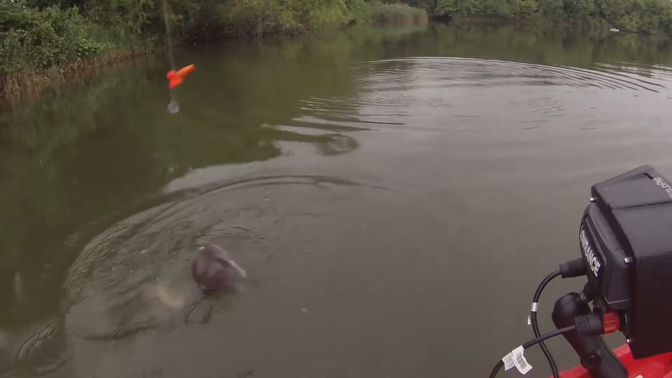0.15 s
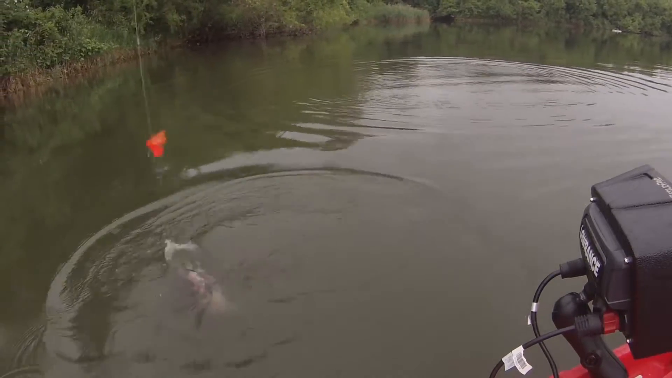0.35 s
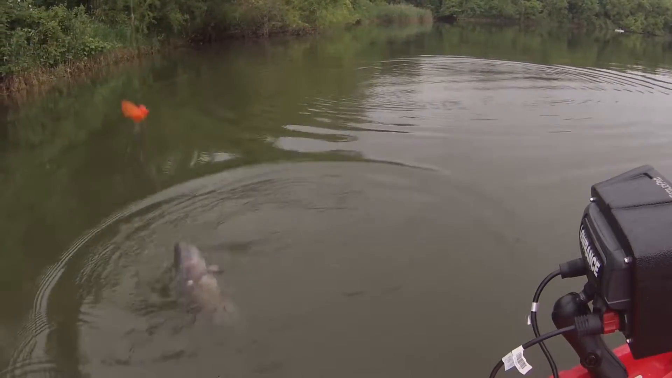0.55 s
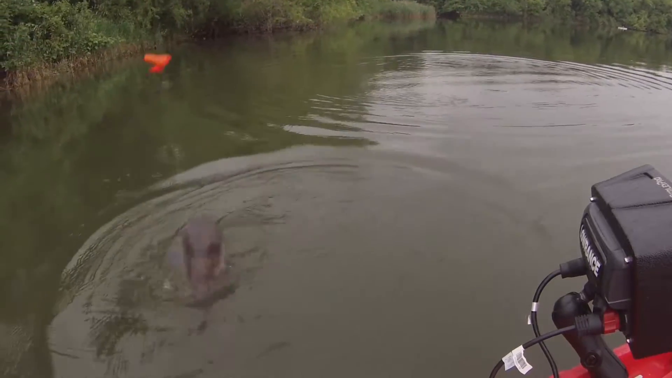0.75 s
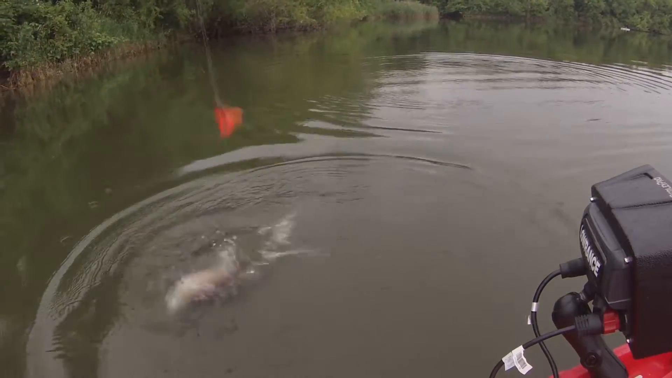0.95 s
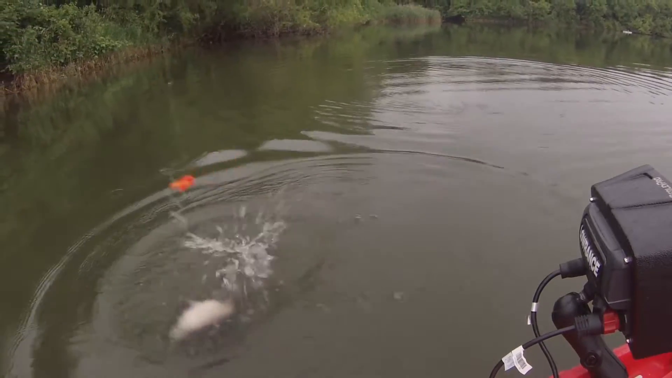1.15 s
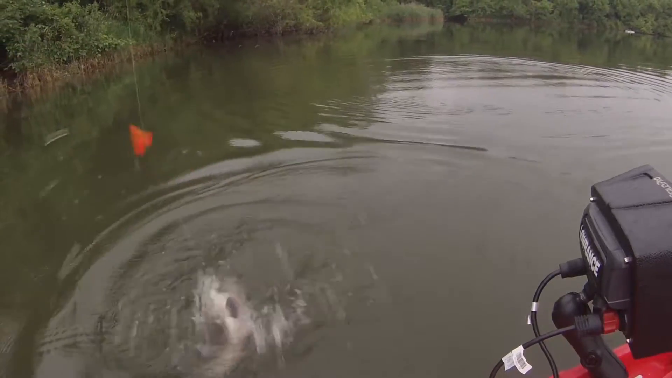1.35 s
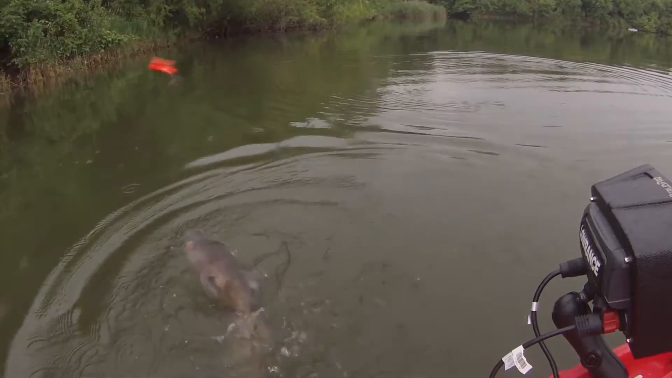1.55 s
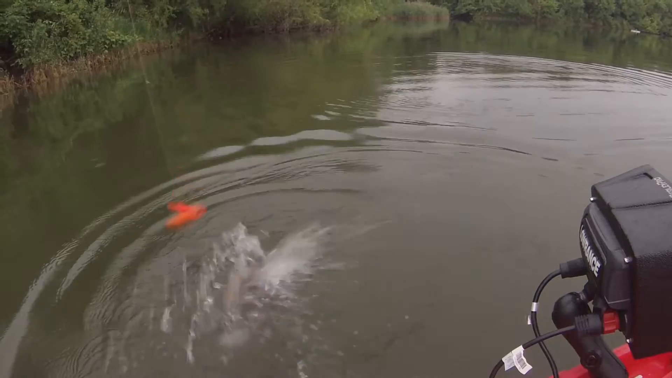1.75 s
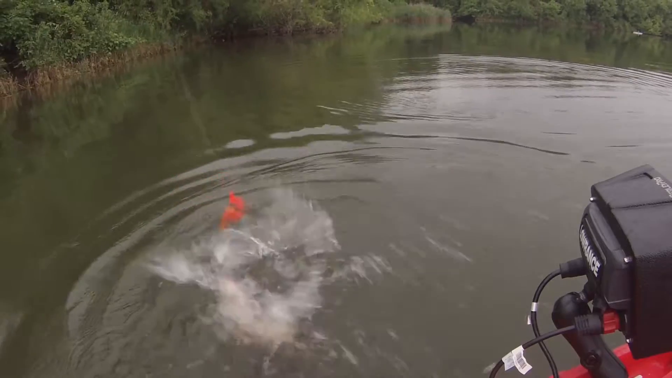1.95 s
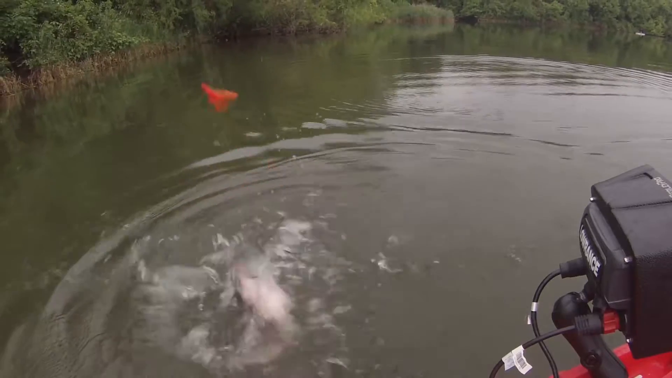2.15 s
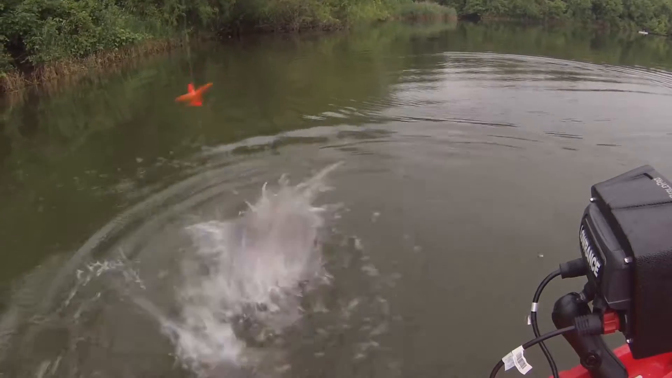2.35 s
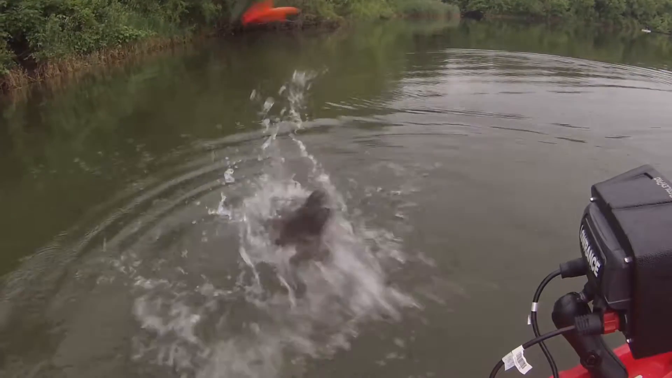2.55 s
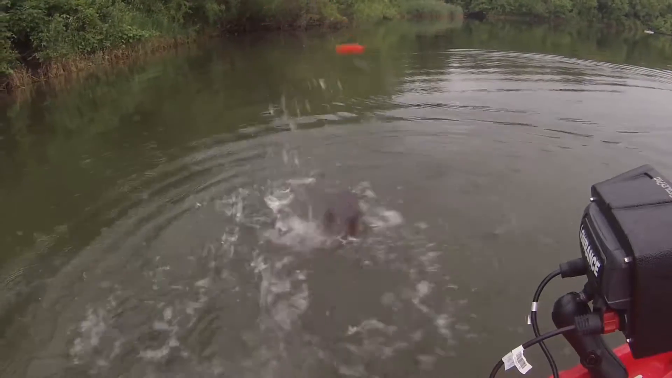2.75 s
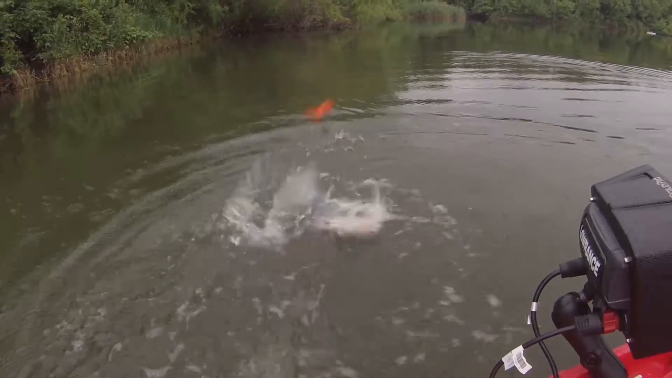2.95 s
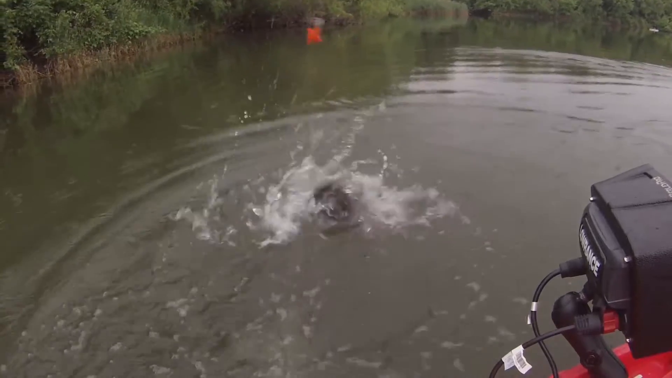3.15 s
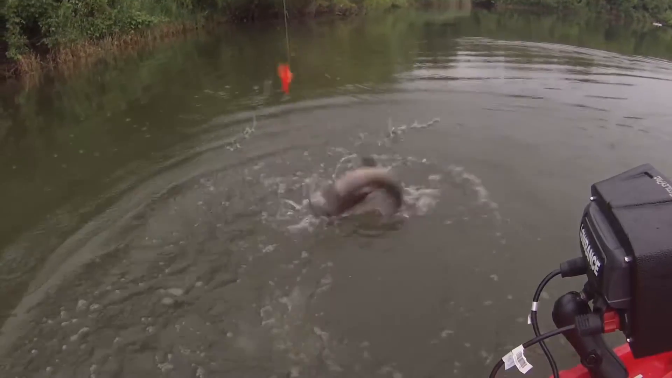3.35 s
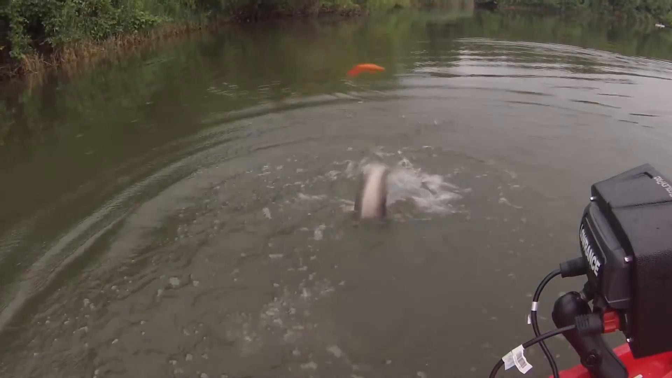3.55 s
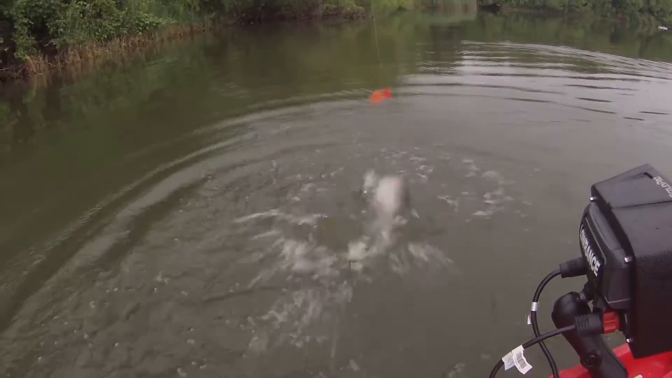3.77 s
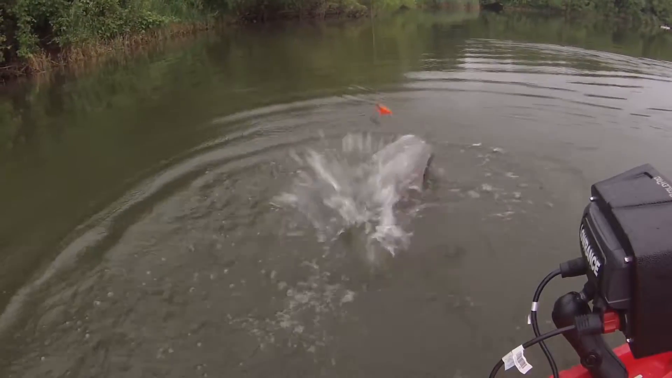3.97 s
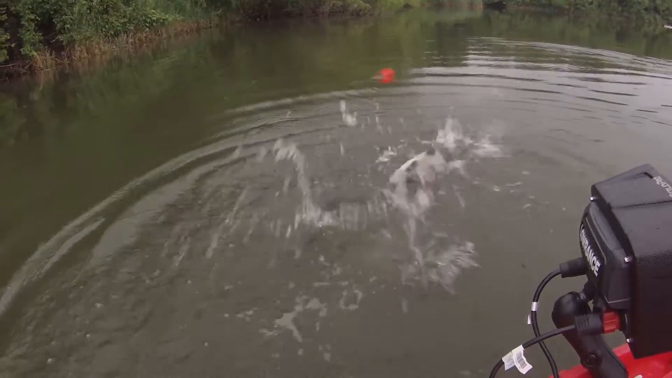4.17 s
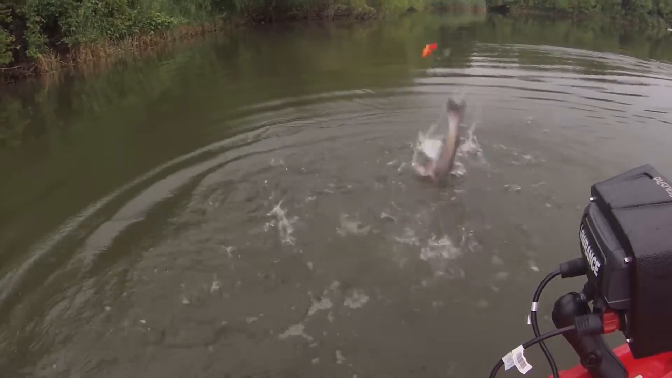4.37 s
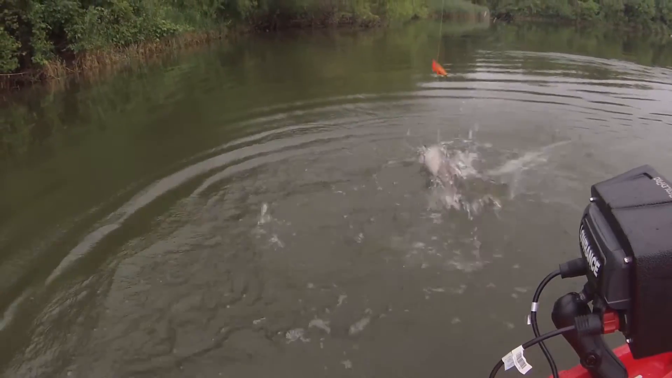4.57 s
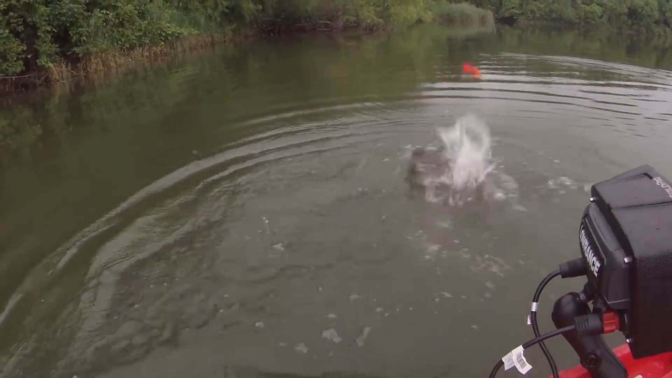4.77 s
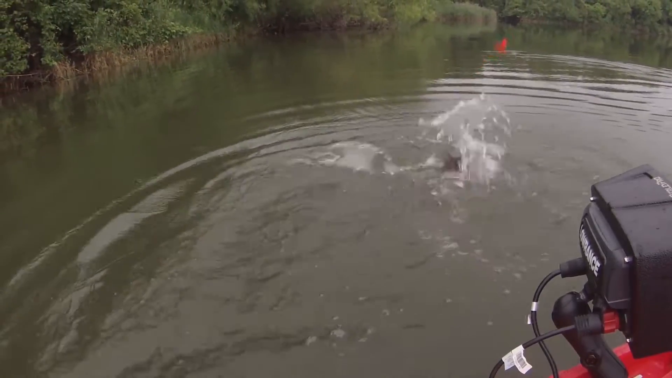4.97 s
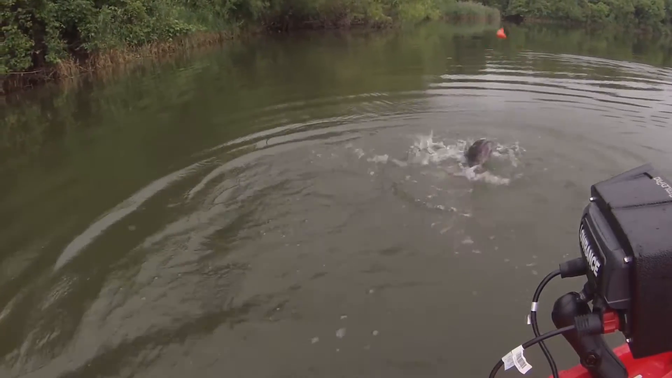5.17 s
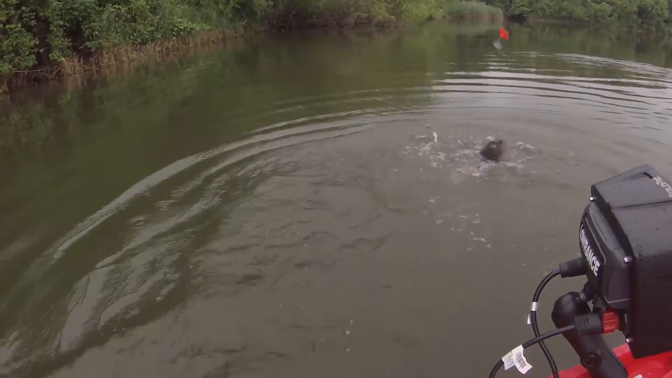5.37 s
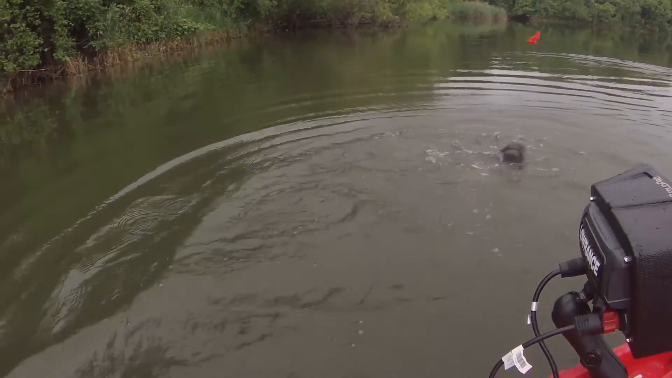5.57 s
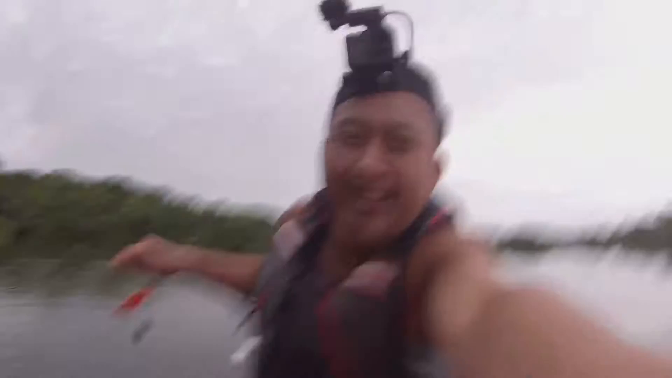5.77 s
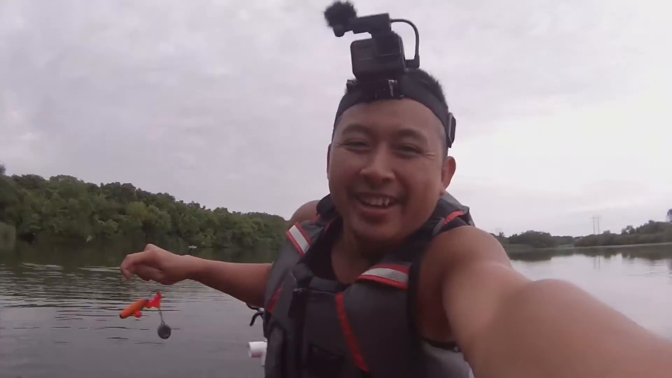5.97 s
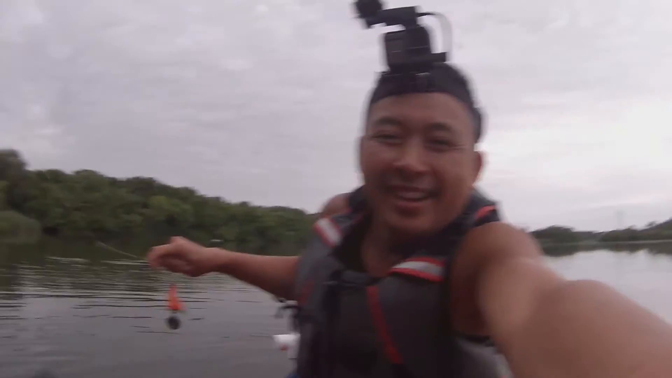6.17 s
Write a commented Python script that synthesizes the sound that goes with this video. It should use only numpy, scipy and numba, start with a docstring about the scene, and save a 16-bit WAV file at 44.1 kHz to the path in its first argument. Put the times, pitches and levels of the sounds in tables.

```python
"""Wind rumbles on a small camera's microphone in a boat on a lake, over a quiet outdoor hiss; birds
call from the bank. From 0.3 s a hooked fish thrashes a few metres away: swarms of ringing grains over
noise make the spray and gurgle, noise bursts the slaps, damped gliding sines the bubbles, brief
bursts the droplets. From 5.4 s, as the thrashing ends, a far bird sings wheezily in slurred sines."""
import sys
import numpy as np
from scipy import signal
from scipy.fft import rfft, irfft
from scipy.io import wavfile
from scipy.ndimage import uniform_filter1d
from numba import njit

SR = 44100
rng = np.random.default_rng(int(sys.argv[2]) if len(sys.argv) > 2 else 0)


def generate_wav(signal):
    """Clip the signal to [-1, 1] and save it as 16-bit WAV at the path in sys.argv[1]."""
    frames = np.transpose(np.atleast_2d(signal))
    scaled = np.clip(frames, -1, 1) * 32767
    pcm = np.round(scaled).astype(np.int16)
    wavfile.write(sys.argv[1], SR, pcm)


def elevation(decibels):
    """Turn decibel levels (scalar or array-like) into linear amplitude ratios."""
    levels = np.asarray(decibels, float)
    return 10 ** (levels / 20)


N = 274302
TIME = np.arange(N) / SR

# wind on the microphone: (time [s], level [dB])
WIND = [(0.0, -36.5), (0.1, -37), (0.43, -44.5), (0.57, -33.5), (1.02, -38), (1.19, -30), (1.28, -37.5),
        (1.52, -31.5), (1.71, -43), (2.18, -19), (2.23, -30), (3.15, -25.5), (3.34, -28), (4.54, -26.5),
        (5.01, -35.5), (5.99, -21), (6.03, -32.5), (6.22, -25)]
# wind spectrum: (frequency [Hz], relative density [dB per Hz])
RUMBLE = [(3, -1), (6, 7.5), (16, -6), (30, -19), (50, -31), (90, -49)]
# outdoor hiss spectrum: (frequency [Hz], relative density [dB per Hz])
LAKE = [(30, -14.5), (60, 1.5), (120, -4), (250, -8.5), (500, -16.5), (1000, -22.5), (2500, -27),
        (5000, -30.5), (8000, -35.5), (13000, -42.5), (16000, -40)]
LAKE_DB = -53.5

# bird notes: (start [s], length [s], first pitch [Hz], last pitch [Hz], relative level [dB])
NOTES = [(.014, 0.024, 4180, 3060, -60.5), (.12, .065, 2000, 2150, -69), (.135, 0.092, 1500, 1490, -67),
         (.259, 0.036, 2310, 2400, -57.5), (.309, 0.028, 3410, 3280, -55), (.483, 0.062, 1540, 1570, -70),
         (.578, 0.03, 2110, 2430, -57.5), (.62, 0.034, 3560, 3180, -57), (.662, 0.12, 453, 378, -59.5)]
# slurs of the far song: (start [s], length [s], first pitch [Hz], last pitch [Hz], relative level [dB])
WHEEZE = [(5.41, 0.087, 5100, 5440, -62), (5.53, 0.072, 5900, 4180, -61), (5.59, 0.099, 4300, 4480, -64),
          (5.72, 0.055, 4300, 4400, -62), (5.83, .11, 5200, 6100, -65), (5.94, 0.09, 5940, 3900, -61),
          (6.0, .05, 4730, 4340, -65), (6.05, 0.077, 4240, 5440, -58), (6.1, 0.13, 5430, 6300, -64)]
ARCH_HZ = 300  # upward bow of notes that start between 1 and 3 kHz
BANK_ECHO_S, BANK_ECHO_DB = .045, -14

# thrashes: (start [s], length [s], relative spray level [dB], gurgle re spray [dB], mist re spray [dB])
THRASHES = [(0.295, .07, -61, 2, -12), (0.382, 0.08, -61, 2, -4), (0.494, 0.045, -61, -2, 0),
            (0.656, 0.063, -62, 5, -1), (0.826, 0.11, -60.5, 4.5, -3), (0.9, 0.073, -50.5, 6, 3),
            (1.008, 0.098, -48.5, -6.5, 3.5), (1.103, 0.037, -65, -13, -3), (1.233, 0.11, -61.5, 0, 0.5),
            (1.32, 0.12, -51.5, -16, -13), (1.506, 0.12, -56, 0, -23), (1.602, 0.15, -46, -0.5, -9),
            (1.76, 0.089, -45.5, -3, -1.5), (1.925, 0.18, -46, 1.5, -1), (2.135, 0.33, -40.5, 2.5, -6.5),
            (2.523, .12, -41.5, -11, -7), (2.68, 0.11, -43.5, -0.5, -7), (2.84, 0.22, -44.5, 0.5, -4),
            (3.093, 0.14, -44.5, 3, -13), (3.241, .14, -45.5, 0.5, -8.5), (3.414, 0.064, -50, 8, -4),
            (3.555, 0.36, -46.5, -5.5, -4.5), (3.786, 0.059, -44.5, 5, -6.5), (3.936, 0.12, -54, 4.5, -9),
            (4.08, 0.23, -43, -5, -16.5), (4.24, 0.16, -44, 2, -11), (4.476, 0.19, -49, 4.5, -12),
            (4.598, 0.088, -41.5, 4.5, -11), (4.738, 0.16, -49, -4, -8.5), (4.906, 0.15, -47.5, -6, -11.5),
            (5.055, 0.1, -43.5, -2.5, -9), (5.297, 0.16, -66.5, -11, -1)]
SURGE_S, SETTLE_DB_PER_S = 0.034, 113  # water is thrown up fast and falls back
STILL_DB = -70  # lapping at rest
GURGLE_HZ, GURGLE_WANDER_OCT = 780, 0.231

# slaps and falling water: (time [s], relative level [dB], body re level [dB], nominal t60 [s])
SLAPS = [(0.3004, -37.5, -7.5, 0.018), (0.386, -19.5, -22, 0.0069), (0.4107, -23, -23, 0.018),
         (0.444, -29, -27, 0.0079), (0.912, -21, -17, .026), (1.052, -26.5, -5, 0.028),
         (1.071, -27, -19, 0.013), (1.271, -27.5, -28, 0.0091), (1.371, -24.5, -15.5, 0.059),
         (1.439, -25, -29, 0.016), (1.5099, -24, -24, 0.015), (1.6482, -19.5, -26, 0.012),
         (1.6795, -13.5, -14.5, 0.047), (1.9168, -23.5, -13, 0.055), (1.939, -21, -13, 0.056),
         (1.9784, -14, 0, 0.008), (2.0244, -20, -16, .015), (2.083, -26, -20, 0.023),
         (2.188, -29, -18, 0.038), (2.2924, -22, -15, 0.018), (2.5406, -7.5, -15.5, .033),
         (2.6294, -29, -7, 0.0097), (2.6774, -23.5, -9.5, 0.075), (2.845, -22.5, -16, 0.017),
         (2.917, -21, -5, 0.035), (2.9453, -23, -7.5, 0.016), (2.9686, -18, -19, 0.062),
         (3.155, -20.5, -14.5, 0.057), (3.256, -34, 0, 0.023), (3.554, -23.5, -11.5, 0.019),
         (3.6451, -17, -11, 0.009), (3.682, -9.5, -10.5, 0.024), (3.7715, -26.5, -6, 0.022),
         (3.821, -21, -1, 0.018), (3.833, -24.5, -4.5, 0.022), (3.8975, -28.5, -14, 0.013),
         (4.0827, -20.5, -11.5, 0.036), (4.1093, -9, -18.5, 0.016), (4.136, -26, -35, 0.038),
         (4.278, -24, -12, 0.046), (4.2953, -16, -10, 0.015), (4.3292, -18, -23, 0.015),
         (4.443, -18.5, -16.5, 0.021), (4.4723, 0, -13, 0.0062), (4.593, -29, -24, 0.015),
         (4.652, -11.5, -15.5, 0.042), (4.776, -23, -16, 0.023), (4.941, -35.5, -3, .025),
         (4.979, -31.5, -27, 0.019), (5.0726, -19, -10, 0.011), (5.15, -27.5, -6, 0.036),
         (5.225, -37, -17, 0.018), (5.315, -38, -11, 0.012), (5.3383, -30.5, -13.5, 0.0075),
         (5.3554, -28, -29, 0.015), (5.406, -38, -30, 0.016), (5.453, -42, -15, 0.019)]
THUMP_DB = -6  # low plunge re the table's body level
SLAP_FIZZ_DB = -21  # re the table's slap level

# large bubbles: (time [s], relative level [dB], first pitch [Hz], t60 [ms], initial climb [oct/s])
BUBBLES = [(.382, -38, 780, 48, 7), (.424, -34.5, 1990, 38, 19), (.549, -49, 940, 50, -1),
           (.692, -38.5, 1560, 26, 2), (0.866, -27.5, 158, 40, 4), (0.924, -30, 1470, 22, 4),
           (1.053, -25.5, 907, 23, 5), (1.16, -49, 1250, 76, 6), (1.27, -34.5, 830, 92, 3.5),
           (1.649, -37.5, 720, 41, 7), (1.692, -23, 308, 32, 2), (1.71, -42.5, 685, 120, 2.5),
           (1.779, -35, 607, 43, 6), (1.838, -26, 390, 25, 6), (1.974, -10.5, 753, 20, 24),
           (1.977, -7, 1470, 12, 33), (2.028, -30.5, 388, 137, .5), (2.153, -23.5, 1290, 23, 4),
           (2.192, -28, 536, 63, -2), (2.231, -27.5, 827, 44, 7), (2.264, -33, 414, 65, -1),
           (2.285, -32.5, 233, 98, 0), (2.315, -24.5, 447, 59, 5), (2.331, -31, 142, 160, 0),
           (2.344, -28.5, 367, 134, 6), (2.36, -20, 790, 20, 7), (2.39, -31, 880, 54, 3),
           (2.429, -35, 775, 47, 0), (2.542, -29, 683, 47, 9), (2.626, -23, 1730, 18, 8),
           (2.719, -31.5, 377, 62, 0), (2.891, -27, 420, 32, 10), (2.92, -36, 311, 110, 0),
           (2.962, -27, 1575, 45, 7.5), (3.006, -36, 605, 44, 16), (3.131, -40, 1085, 74, 1.5),
           (3.16, -41, 620, 110, 1), (3.19, -40, 656, 37, 3), (3.351, -27, 1340, 15, 10),
           (3.536, -23, 315, 39, 7), (3.68, -28, 368, 46, 4), (3.809, -30, 636, 52, 2),
           (3.827, -23, 276, 66, 7.5), (3.84, -19.5, 482, 28, -4), (3.859, -22.5, 356, 64, 6),
           (3.969, -42, 259, 190, 13), (4.009, -44.5, 750, 178, 3), (4.069, -35.5, 925, 62, 4),
           (4.244, -31, 560, 38, 4), (4.264, -35, 784, 75, 1), (4.296, -25, 304, 92, 3),
           (4.345, -36, 610, 55, 5), (4.406, -35, 680, 68, 15), (4.47, -10, 1570, 12.5, 9),
           (4.519, -37.5, 552, 90, 10.5), (4.561, -35, 910, 68, 9), (4.642, -31, 466, 83, 6),
           (4.679, -30.5, 298, 110, 3.5), (4.68, -27, 846, 34, 4), (4.769, -35, 523, 110, 14.5),
           (4.797, -27, 784, 35, 30), (4.81, -35.5, 457, 120, 1), (4.866, -37, 293, 61, -2),
           (4.938, -33.5, 1096, 51, 0), (5.004, -41, 880, 83, 1.5), (5.062, -26, 1370, 24, 3),
           (5.075, -32, 927, 70, 4), (5.14, -35.5, 563, 91, 12), (5.36, -46, 1020, 61, 0)]
PINCH_CYCLES, PINCH_LOSS_DB = 1.5, 3.5  # cycles a bubble takes to pinch off; peak lost meanwhile

# fine droplets landing near the boat: (time [s], relative level [dB])
TICKS = [(.517, -27.5), (.5293, -26), (0.5367, -27), (0.557, -32), (.5736, -30.5), (0.6841, -32.5),
         (.9413, -28), (1.059, -21), (1.162, -25), (1.1856, -29), (1.2072, -26), (1.233, -31),
         (1.238, -25.5), (1.308, -30), (1.3255, -26), (1.34, -33), (1.4552, -29), (1.805, -24),
         (1.8222, -19), (1.939, -13), (1.997, -16.5), (2.009, -19), (2.0818, -15.5), (2.16, -32),
         (2.237, -11.5), (2.3353, -17.5), (2.7, -22), (3.057, -29), (3.096, -29), (3.339, -24.5),
         (4.372, -24), (4.4693, -23), (4.655, -31.5), (5.0637, -21), (5.5072, -37), (5.5383, -37),
         (5.578, -39), (5.7823, -30), (5.7954, -32.5), (5.8343, -37)]

# microphone housing resonances: (frequency [Hz], width [Hz], gain [dB])
MICROPHONE = [(4300, 996, 9), (12960, 230, 6.5)]
TOP_HZ = 15200


def unit(x):
    """Scale to rms 1."""
    return x / np.sqrt(np.mean(x ** 2))


def coloured(points):
    """Noise of rms 1 with a spectrum of (frequency [Hz], density [dB]) points."""
    points_hz, points_db = np.transpose(points)
    f_hz = np.arange(N // 2 + 1) * SR / N + .1  # offset keeps the log finite
    gain = elevation(np.interp(np.log(f_hz), np.log(points_hz), points_db, left=-90, right=-90))
    return unit(irfft(rfft(rng.standard_normal(N)) * gain, N))


def band(x, lo_hz, hi_hz):
    """Gentle band-pass."""
    return signal.sosfilt(signal.butter(2, [lo_hz, hi_hz], "bandpass", fs=SR, output="sos"), x)


def noise_band(lo_hz, hi_hz):
    """Band of noise, rms 1."""
    return unit(band(rng.standard_normal(N), lo_hz, hi_hz))


def walk(rate_hz):
    """Smooth random wander, rms 1: held random values, averaged twice."""
    hold = int(SR / rate_hz)
    held = np.repeat(rng.standard_normal(N // hold + 1), hold)
    return unit(uniform_filter1d(uniform_filter1d(held, hold), hold)[:N])


@njit
def ring(start, size, hz, t60_s, rise_oct_per_s, n, sr):
    """Damped sines whose pitch glides, mostly upward."""
    out = np.zeros(n)
    for e in range(len(start)):
        z = size[e] + 0j
        fade = 1000 ** (-1 / (t60_s[e] * sr))
        step = 2 * np.pi * hz[e] / sr
        turn = fade * np.exp(1j * step)
        glide = np.exp(1j * step * rise_oct_per_s[e] * np.log(2) / sr)
        for i in range(start[e], min(n, start[e] + int(t60_s[e] * sr))):
            out[i] += z.imag
            z *= turn
            turn *= glide
    return out


def grains(db, lo_hz, hi_hz, cycles, spread_db, rise_oct, count):
    """Random drops or bubbles: few large, many small; the pitch range may move in time."""
    when, pitch, length, big = rng.random((count, 4)).T
    start = (when * (N - 1)).astype(np.int64)
    lo, hi = (np.broadcast_to(edge, N)[start] for edge in (lo_hz, hi_hz))
    hz = lo * (hi / lo) ** pitch
    t60_s = cycles * (0.5 + 2.46 * length ** 2) / hz
    size = elevation(-spread_db * np.log(1 - .99 * big))
    # mean power of the swarm before levels are applied
    power = np.sum(size ** 2 * t60_s) / (4 * np.log(1000)) / TIME[-1]
    return ring(start, size * elevation(db[start]) / np.sqrt(power), hz, t60_s, rise_oct / t60_s, N, 1. * SR)


def wind():
    """Wind pressure on the microphone: low rumble that follows the gust levels."""
    return elevation(np.interp(TIME, *np.transpose(WIND))) * coloured(RUMBLE)


def lake_hiss():
    """Distant hiss of the lake: coloured noise, its level slightly unsteady."""
    return elevation(LAKE_DB + 0.26 * walk(6.8)) * coloured(LAKE)


def whistle(rows, arch_hz, waver):
    """Slurred sine notes that swell and fade; waver multiplies their pitch."""
    out = np.zeros(N)
    for start_s, length_s, first_hz, last_hz, db in rows:
        a = int(start_s * SR)
        u = np.linspace(0, 1, int(length_s * SR))[:N - a]
        here = slice(a, a + len(u))
        bow = np.sin(np.pi * u)
        arch = arch_hz * bow * (first_hz > 1000) * (first_hz < 3000)
        pitch_hz = (first_hz + (last_hz - first_hz) * u + arch) * waver[here]
        out[here] += elevation(db) * bow ** 0.12 * np.sin(2 * np.pi * np.cumsum(pitch_hz) / SR)
    return out


def with_bank_echo(x):
    """The trees on the bank return a fainter, later copy."""
    return x + elevation(BANK_ECHO_DB) * np.pad(x, (int(BANK_ECHO_S * SR), 0))[:N]


def bird_notes():
    """Short slurred whistles of flickering level."""
    return with_bank_echo(elevation(5.5 + 3.6 * walk(300)) * whistle(NOTES, ARCH_HZ, np.ones(N)))


def thrashing():
    """Spray, gurgle and mist levels in dB: each thrash surges, holds and settles; their powers add."""
    power = np.full((3, N), elevation(2 * STILL_DB))
    for start_s, length_s, db, gurgle_db, mist_db in THRASHES:
        surge = np.clip((TIME - start_s) / SURGE_S, 0, 1)
        settle = elevation(-SETTLE_DB_PER_S * np.maximum(TIME - start_s - length_s, 0))
        peaks = elevation(db + np.array([0, gurgle_db, mist_db]))
        power += np.outer(peaks, surge * settle) ** 2
    return 10 * np.log10(power)


def churn():
    """Spray, gurgle and mist: each a swarm of grains over a rush of unresolved ones."""
    spray, gurgle, mist = thrashing()
    centre_hz = GURGLE_HZ * 2 ** (GURGLE_WANDER_OCT * np.clip(walk(12), -2, 2))
    patter = walk(45)  # drops land in clumps, heard in all the treble at once
    spray = spray + 1.16 * patter + 2.4 * walk(78)
    mist = mist + 0.61 * patter + 3.44 * walk(60)
    gurgle = gurgle + 3.14 * walk(22)

    rush = elevation(spray - 8) * noise_band(1100, 7500)
    rush += elevation(mist - 6) * noise_band(7000, 15500)
    rush += elevation(gurgle - 9) * noise_band(220, 1700)

    drops = grains(spray - 3, 2004, 7330, cycles=22.0, spread_db=2.57, rise_oct=0.23, count=4000)
    drops += grains(spray - 8, 900, 2665, cycles=26.0, spread_db=1.8, rise_oct=0.75, count=1200)
    fizz = grains(mist - 3, 7600, 13000, cycles=12.0, spread_db=6.1, rise_oct=.1, count=5000)
    # bursting foam: bare clicks
    fizz += grains(mist - 6, 5000, 15000, cycles=2.3, spread_db=2.5, rise_oct=.05, count=1500)
    plops = grains(gurgle - 3, 0.75 * centre_hz, 2.3 * centre_hz, cycles=20.8, spread_db=2.2,
                   rise_oct=1.09, count=1600)
    return rush + drops + fizz + plops


def crack_noise():
    """Bright band of a slap."""
    return noise_band(1900, 7530)


def fizz_noise():
    """Topmost band of a slap or droplet."""
    return noise_band(6500, 14200)


def add_burst(out, start_s, db, t60_s, noise):
    """Add a burst that swells for a moment, then fades while spray falls; scaled to its peak."""
    a = int(start_s * SR)
    t = TIME[:min(int(.1 * SR), N - a)]
    here = slice(a, a + len(t))
    u = t / max(t60_s, .003)
    swell = 1 - np.exp(-u / 0.14)
    fade = 1000. ** -u + 0.15 * 1000. ** (-u / 4)
    burst = swell * fade * noise[here]
    out[here] += elevation(db) * burst / np.max(np.abs(burst))


def slaps():
    """Tail and body hit the water: ragged noise bursts, each with its own share of body."""
    ragged = elevation(5.7 * walk(1100))
    thump = ragged * noise_band(130, 460)
    body = ragged * noise_band(380, 2330)
    crack = ragged * crack_noise()
    fizz = ragged * fizz_noise()
    out = np.zeros(N)
    for start_s, db, body_db, t60_s in SLAPS:
        add_burst(out, start_s, db - 7.5, t60_s, crack)
        add_burst(out, start_s, db + body_db + 6.0, t60_s, body)
        add_burst(out, start_s, db + body_db + THUMP_DB, 2 * t60_s, thump)
        add_burst(out, start_s, db + SLAP_FIZZ_DB, t60_s, fizz)
    return out


def bubbles():
    """Pockets of air pulled under by the fish; they pinch off and glide, their level flickering at random."""
    start_s, db, hz, t60_ms, rise = np.transpose(BUBBLES)
    start = (start_s * SR).astype(np.int64)
    t60_s = np.maximum(t60_ms, 5) / 1000
    # subtracting a faster-fading twin makes the tone swell in
    pinch_s = 1 / (1 / t60_s + hz / (PINCH_CYCLES * np.log(1000)))
    tones = ring(start, elevation(db), hz, t60_s, rise, N, 1. * SR)
    tones -= ring(start, elevation(db), hz, pinch_s, rise, N, 1. * SR)
    return tones * elevation(PINCH_LOSS_DB + 3.13 * walk(150))


def droplets():
    """Fine droplets only tick: very short ragged bursts of treble."""
    noise = elevation(5.7 * walk(1100)) * (fizz_noise() + 0.37 * crack_noise())
    out = np.zeros(N)
    for start_s, db in TICKS:
        add_burst(out, start_s, db - 6.0, .007, noise)
    return out


def wheezy_song():
    """Far bird: slurred sines of wandering pitch, made breathy by a fast random level."""
    slurs = whistle(WHEEZE, 0, 1 + 0.0091 * walk(60))
    return with_bank_echo((0.34 + walk(900)) * slurs)


def microphone_housing(water):
    """Housing resonances, in series, lift narrow bands."""
    for hz, width_hz, db in MICROPHONE:
        peak = signal.lfilter(*signal.iirpeak(hz, hz / width_hz, fs=SR), water)
        water = water + (elevation(db) - 1) * peak
    return water


def scene():
    """Water through the microphone housing, over wind, hiss and birds."""
    background = wind() + lake_hiss() + bird_notes()
    water = churn() + slaps() + bubbles() + droplets()
    return (background + microphone_housing(water) + wheezy_song())[None]


def top_cut(x):
    """Nothing passes above the cut-off."""
    return signal.sosfilt(signal.butter(12, 16370, fs=SR, output="sos"), x)


def record(dry):
    """The camera cuts the top with a steep low-pass; full scale limits the peaks."""
    top = signal.ellip(6, .5, 30, TOP_HZ, fs=SR, output="sos")
    mix = np.clip(signal.sosfilt(top, dry), -1, 1)
    return top_cut(mix)


dry = scene()
out = record(dry)
generate_wav(out)
```